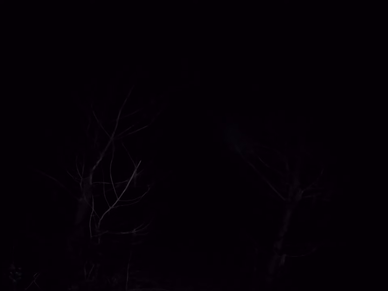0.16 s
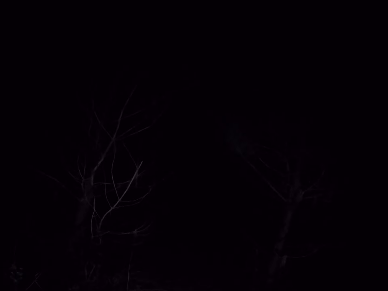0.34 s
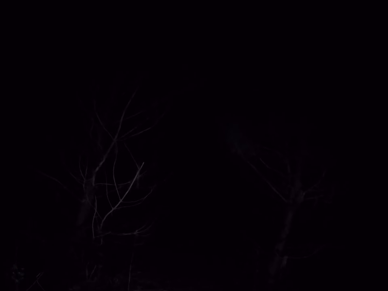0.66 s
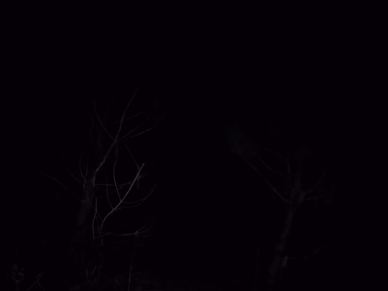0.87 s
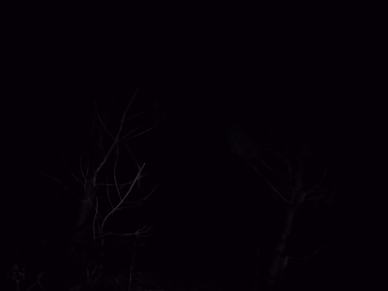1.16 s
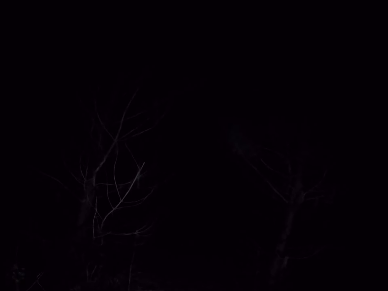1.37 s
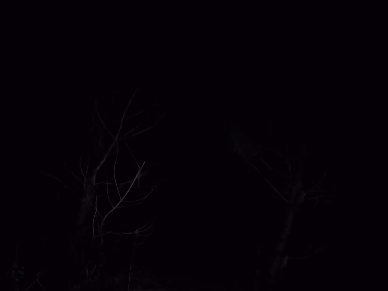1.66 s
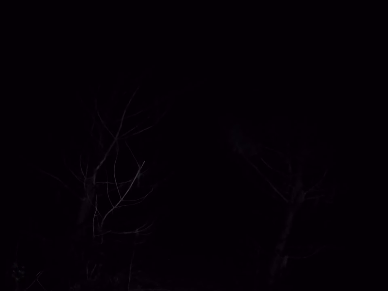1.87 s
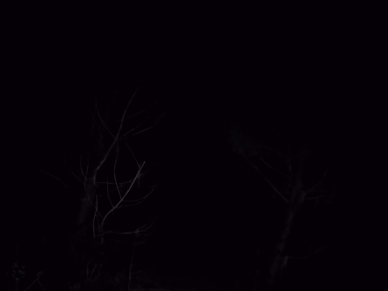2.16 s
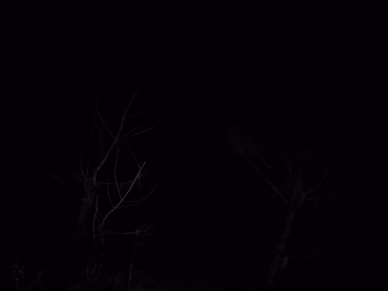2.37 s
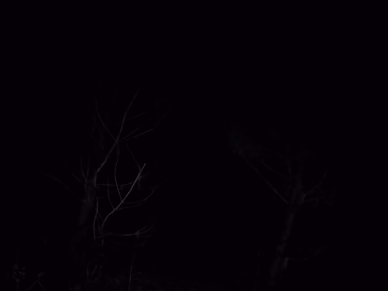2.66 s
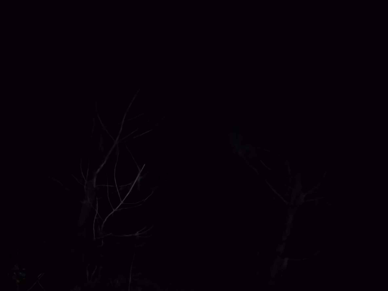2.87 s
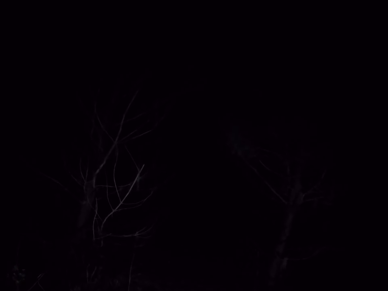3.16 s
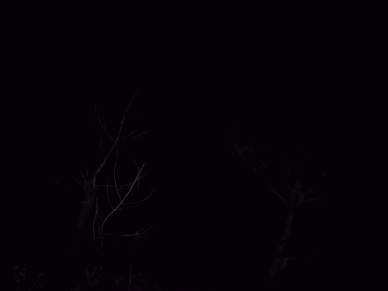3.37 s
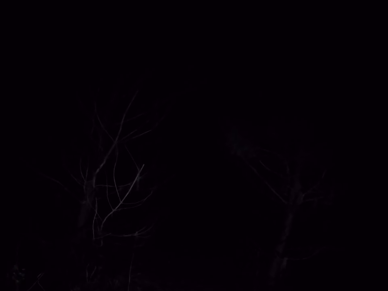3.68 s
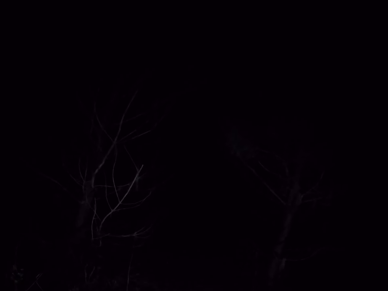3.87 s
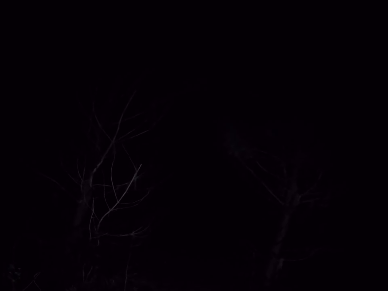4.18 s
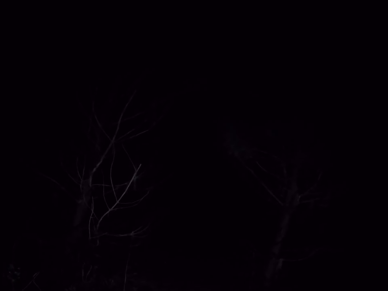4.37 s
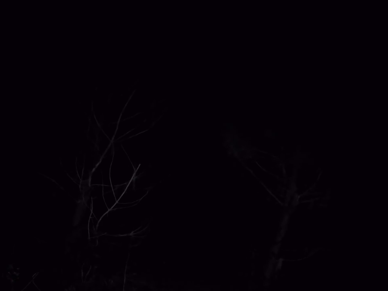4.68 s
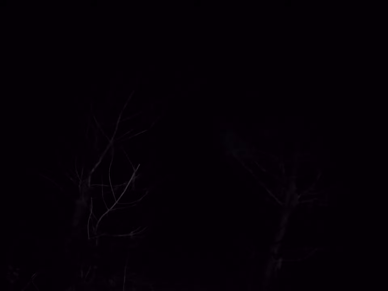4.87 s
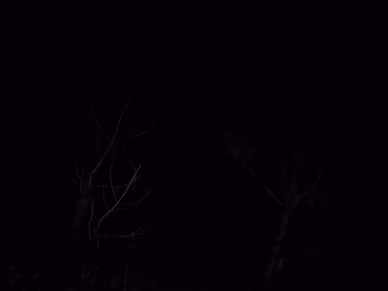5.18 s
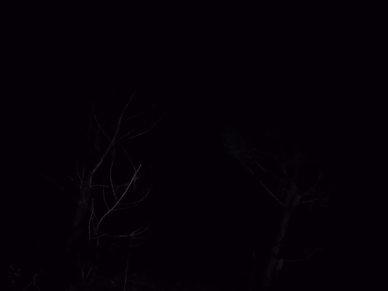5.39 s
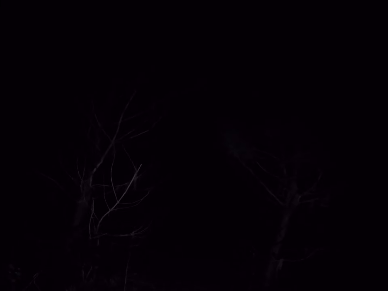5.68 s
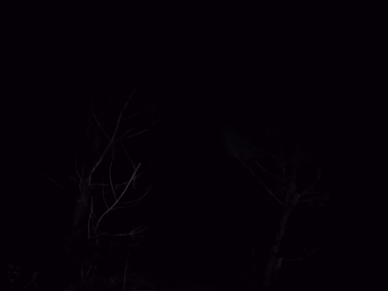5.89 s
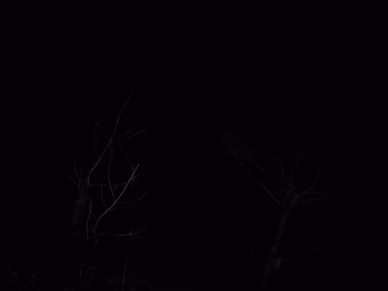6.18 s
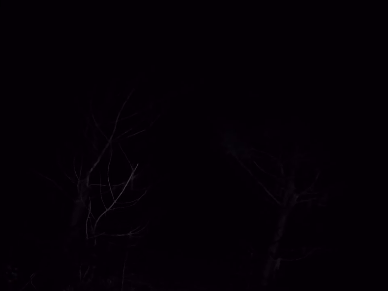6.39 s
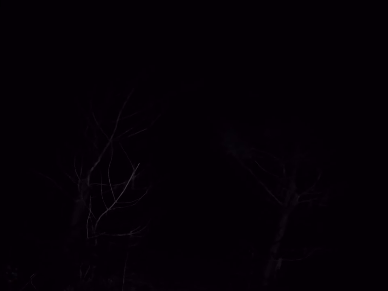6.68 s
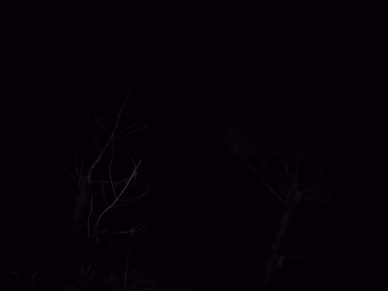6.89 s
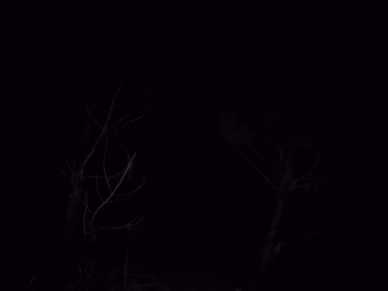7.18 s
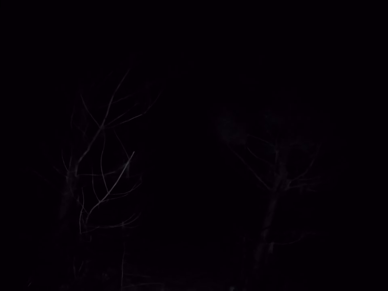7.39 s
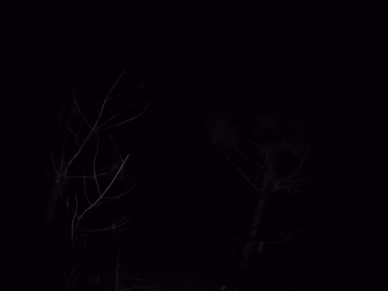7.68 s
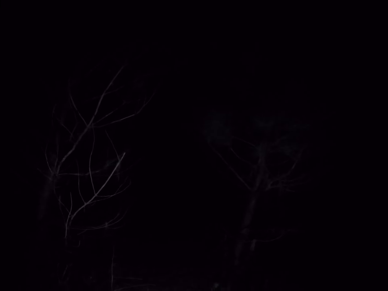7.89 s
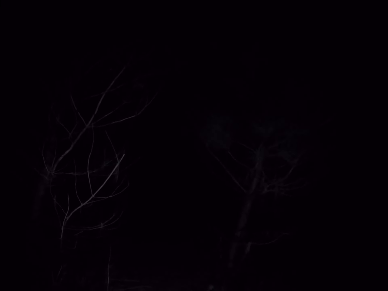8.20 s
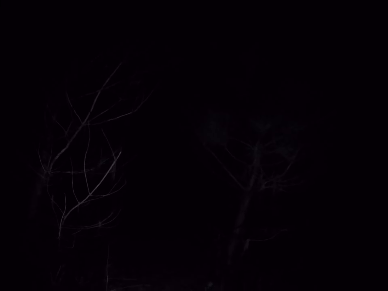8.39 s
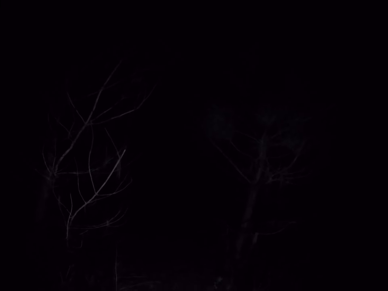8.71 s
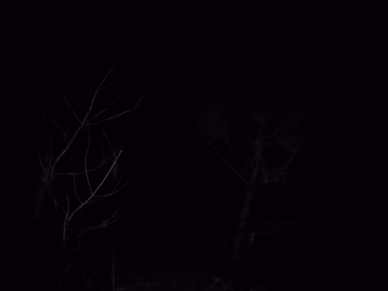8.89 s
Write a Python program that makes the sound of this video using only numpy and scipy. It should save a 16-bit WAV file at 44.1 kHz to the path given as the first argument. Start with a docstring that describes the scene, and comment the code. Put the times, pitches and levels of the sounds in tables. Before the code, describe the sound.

Distant hounds bay and bark hoarsely through echoing night woods while crickets chirp steadily close by and katydids rasp over a faint insect hiss.

```python
"""Hounds bay and bark far off in night woods: sung overtone stacks and hoarse pulse trains. The trees smear
every call into a long echo of decaying noise. Close by, crickets chirp, tick and trill as gated tones and
katydids rasp as toothed noise; farther insects hiss in bands, with sizzle and faint ticks of shaped noise; a
few breathy puffs of dull noise come and go. Air and far rumble lie under all, and the hand-held recorder takes
a few soft bumps."""
import sys
import numpy as np
from scipy import signal
from scipy.fft import rfft, irfft, next_fast_len
from scipy.io import wavfile
from scipy.ndimage import uniform_filter1d, map_coordinates

SR = 44100
rng = np.random.default_rng(int(sys.argv[2]) if len(sys.argv) > 2 else 0)


def transcribe(signal):
    """Save signal, clipped to [-1, 1], as a 16-bit WAV file at the path in sys.argv[1]."""
    frames = np.atleast_2d(signal).T
    limited = np.clip(frames, -1, 1)
    pcm = np.round(limited * 32767).astype(np.int16)
    wavfile.write(sys.argv[1], SR, pcm)


N = 399105
TIME_S = np.arange(N) / SR

# throat resonances of the nearer and farther barking dogs: centre_hz, width_hz, level_db
NEAR_THROAT = [(793, 96, 0), (998, 27, 1.5), (1300, 84, 0.5), (1440, 60, 5.5), (1650, 170, 0)]
FAR_THROAT = [(666, 253, -5.5), (965, 96, -5), (1264, 52, -2), (1410, 41, 1), (1680, 175, -9)]


def amp(db):
    """Decibels to gain."""
    return 10 ** (np.asarray(db) / 20)


def unit(x):
    """Scaled to rms 1."""
    return x / np.sqrt(np.mean(x ** 2) + 1e-20)


def along(points, hz):
    """Values at hz, read between (Hz, value) points on a log frequency axis."""
    f, v = np.transpose(points)
    return np.interp(np.log(hz + 1), np.log(f + 1), v)


def wobble(rate, size=N):
    """A smooth random curve with rate knots a second."""
    coarse = np.arange(0, size + 16, 16)
    knots = rng.standard_normal(int(size * rate / SR) + 4)
    curve = map_coordinates(knots, [coarse * rate / SR])
    return np.interp(np.arange(size), coarse, curve)


def filtered(x, response):
    """x shaped by a complex response of frequency."""
    m = next_fast_len(x.shape[-1] + 8192)
    spectrum = rfft(x, m) * response(np.fft.rfftfreq(m, 1 / SR))
    return irfft(spectrum, m)[..., :x.shape[-1]]


def resonances(modes):
    """Causal response of (centre Hz, width Hz, dB) resonances, added with alternating sign."""
    def response(f):
        return sum((-1) ** k * amp(db) * 1j * f * w / (c * c - f * f + 1j * f * w)
                   for k, (c, w, db) in enumerate(modes))
    return response


def call(rows):
    """First sample, times, soft edges and per-sample columns of one call."""
    s, *cols = np.transpose(rows)
    first = round(s[0] * SR)
    t = np.arange(first, min(N, round(s[-1] * SR))) / SR
    since_start = t - s[0] + (s[0] == 0)  # a call at time zero is already under way
    edge = np.clip(np.minimum(since_start / 0.0043, (s[-1] - t) / 0.019), 0, 1)
    return first, t, edge, [np.interp(t, s, c) for c in cols]


def add(track, x, at):
    """Mix x into track from sample at."""
    at = max(at, 0)
    track[at:at + len(x)] += x[:len(track) - at]


def hiss(spectrum, patchy_db):
    """Noise of rms 1 with patches of random gain in time and frequency."""
    z = signal.stft(rng.standard_normal(N), nperseg=512)[2]
    field = uniform_filter1d(rng.standard_normal(z.shape), 6, 0)
    field = uniform_filter1d(field, 14, 1)
    patchy = signal.istft(z * amp(patchy_db * unit(field)), nperseg=512)[1][:N]
    return unit(filtered(patchy, lambda hz: amp(along(spectrum, hz))))


def bays():
    """Overtone stacks on the pitch, brighter as the mouth opens; rough voices shake in phase and size."""
    # sung bays, one list each: time_s, pitch_hz, level_db, mouth opening as slope_db_per_octave
    sung = [
        [(0, 676, -41.5, -3), (.06, 675, -42.5, -10), (.135, 675, -52, -6)],
        [(.405, 410, -70, 3), (.425, 473, -63, 4.5), (.45, 528, -58, 6), (.48, 539, -52.5, 0.5),
         (.51, 584.4, -44, -13), (.55, 589, -41, -10), (.6, 594, -44, -20), (.63, 578, -52, 0)],
        [(3.16, 659, -60, -4), (3.19, 668, -41, -24), (3.22, 685.3, -36, -24), (3.25, 655.3, -43.5, -13),
         (3.28, 681, -33, -18.5), (3.39, 666, -66, 3)],
        [(3.79, 649, -51, -13), (3.82, 665, -38.5, -20), (3.85, 714, -41.5, -5.5), (3.88, 720.7, -39, -12),
         (3.99, 725, -44, -17), (4.03, 707, -60, -4)],
        [(5.36, 724, -80, -5), (5.39, 744, -52, -7), (5.43, 788, -58.5, 3), (5.48, 817, -55.5, -3),
         (5.53, 826, -76, -4)],
        [(5.72, 525, -69, -6), (5.75, 548, -59.5, -4), (5.78, 602, -51, -3.5), (5.81, 609, -45.5, -6),
         (5.86, 618.6, -36, -19.5), (5.9, 619.7, -40, -30), (5.99, 614, -66, -15)],
        [(7.63, 325.5, -80, -8), (7.665, 436, -64, -1), (7.69, 501, -55, -3), (7.725, 515, -51.5, 1),
         (7.745, 571, -39, -22), (7.77, 578, -43, -8), (7.855, 566.6, -55, -8), (7.89, 490, -61, -15)],
        [(8.55, 485, -74, -2), (8.59, 521.8, -60, 3.5), (8.63, 561.6, -50, 0), (8.67, 596, -43, -7.5),
         (8.71, 598, -46.5, -18), (8.8, 614, -48, -19)],
        [(8.59, 697, -55, -19), (8.615, 699.4, -36, -13.5), (8.69, 708, -44, -6), (8.78, 698, -41.5, -23),
         (8.81, 684, -43, -7)],
    ]
    # voice of each bay: roughness (0-1), upper_db (harmonics above 2), edge_db more (harmonics above 5)
    voices = [(0.17, -5, 0), (0.05, 0, -7), (0.21, -3, 10), (0.1, 2, -8), (0.14, -5, -2), (.05, 0.5, -3),
              (0.04, -3.5, -4), (.17, -4.5, -3), (0.12, -2, 18)]
    # throat colour of the harmonics: frequency_hz, level_db
    colour = [(900, -2), (1150, 1.5), (1400, 0), (1620, 1.5), (2000, -6.5), (2550, 1), (2750, -0.5),
              (3000, -15.5), (9000, -27)]
    octave_share = 0.86  # the second harmonic feels the closing mouth less
    out = np.zeros(N)
    for rows, (rough, upper_db, edge_db) in zip(sung, voices):
        at, t, edge, (hz, db, slope_db) = call(rows)
        size = len(t)
        phase = 2 * np.pi * np.cumsum(hz) / SR + 3 * rough * wobble(140.8, size)
        stack = amp(db) * np.sin(phase)
        for k in range(2, 13):
            octaves = np.log2(min(k, 4)) if k > 2 else octave_share
            level_db = db + slope_db * octaves + along(colour, k * hz)
            level_db = level_db + (k > 2) * upper_db + (k > 5) * edge_db
            # each harmonic breaks up on its own, in level and in phase
            breaking_db = 2.5 * wobble(80, size) + 3 * wobble(25, size)
            drift = .4 * (k - 1) * wobble(80, size) + rng.uniform(0, 2 * np.pi)
            stack += amp(level_db + breaking_db) * np.sin(k * phase + drift)
        shake = amp(11.0 * rough * wobble(67.0, size))
        add(out, np.sqrt(2) * edge * stack * shake, at)
    return out


def barks():
    """Fold pulses start regular, then alternate strong and weak and turn unsteady; throat and muzzle colour them."""
    # hoarse barks: start_s, attack_s, length_s until the release, level_db, mean fold pulses_hz,
    # throat, clear_s before the voice turns unsteady, first muzzle brightness_db
    hoarse = [(.055, .04, .13, -42.5, 333, FAR_THROAT, 0.0031, -8.5),
              (2.909, .016, 0.11, -36.5, 336, NEAR_THROAT, 0.019, 0.5),
              (3.159, .03, 0.15, -46, 336, FAR_THROAT, 0.0013, -6),
              (3.62, 0.013, .11, -38, 337, NEAR_THROAT, 0.021, 1),
              (5.376, .025, 0.0886, -52.5, 348, FAR_THROAT, 0.00095, 1.5),
              (8.75, 0.082, 0.19, -45.5, 344, FAR_THROAT, 0.0027, 1.5)]
    # muzzle resonances: centre_hz, width_hz, level_db
    muzzle = [(2100, 420, 15.5), (3100, 720, 11.5)]
    # the mouth before it opens: centre_hz, width_hz, level_db
    closed = [(924, 170, 3), (1740, 45, -9)]
    bright_s, dulling_db_per_s, dullest_db = 0.03, 328, -25  # the muzzle stays bright, then closes
    release_db_per_s, tail_s = 330, .09

    def coloured(source, modes):
        """Source through resonances, thinned below 600 Hz and above 3200 Hz, at rms 1."""
        def response(f):
            low_cut = (f / 600) ** 6 / (1 + (f / 600) ** 6)
            return resonances(modes)(f) * low_cut / (1 + (f / 3200) ** 8)
        return unit(filtered(source, response))

    out = np.zeros(N)
    for s, attack, length, peak_db, hz, throat, clear, first_db in hoarse:
        at, t, edge, _ = call([(s,), (s + length + tail_s,)])
        size, since = len(t), t - t[0]
        edge = edge * np.clip((t - s) / attack, 0, 1)
        db = peak_db - release_db_per_s * np.maximum(t - s - length, 0)
        bright_db = first_db - dulling_db_per_s * np.maximum(t - s - bright_s, 0)
        bright_db = np.maximum(bright_db, dullest_db)

        chaos = np.clip((since - clear) / 0.022, .02, 1)
        unsteady = chaos * (.1 * wobble(150, size) + .03 * wobble(25, size))
        cycles = np.cumsum(hz * np.exp(unsteady)) / SR
        pulses = np.diff(np.floor(cycles), prepend=0)
        size_db = chaos * (3 * (-1) ** np.floor(cycles) + rng.uniform(-3, 3, size))
        breath = .8 * chaos * rng.standard_normal(size)
        source = unit(pulses * amp(size_db)) + breath

        sink = np.clip((since - .05) / 0.083, 0, 1)  # the throat lengthens and its resonances fall
        lowered = [(.91 * c, w, g) for c, w, g in throat]
        voice = np.sqrt(1 - sink) * coloured(source, throat) + np.sqrt(sink) * coloured(source, lowered)
        voice += amp(bright_db) * coloured(source, muzzle)
        opening = np.clip((since - clear / 2) / 0.025, 0, 1)
        voice = opening * voice + 0.97 * (1 - opening) * coloured(source, closed)
        add(out, edge * amp(db) * voice, at)
    return out


def woods(x):
    """Trunks scatter each short stretch of sound along its own paths; highs die first."""
    # echo decay among the trees: frequency_hz, t60_s
    decay = [(500, 0.81), (1300, 0.96), (3000, 0.54), (8000, 0.11)]
    out, step = np.zeros(N), SR // 9
    for at in range(0, N, step):
        stretch = x[at:at + step]
        if np.any(stretch):
            hz, t, z = signal.stft(rng.standard_normal(SR), SR, nperseg=256)
            fading = z * amp(-60 * t / along(decay, hz)[:, None])
            tail = signal.istft(fading, SR, nperseg=256)[1]
            # the echo starts 300 samples behind the call
            add(out, signal.fftconvolve(stretch, tail / np.linalg.norm(tail)), at + 300)
    return out


def chirp(length, hz, rate, blur):
    """Wing strokes at a steady rate, each a short tone, slightly unsteady."""
    t = np.arange(round((length + 1 / rate) * SR)) / SR
    gate = np.clip(np.sin(np.pi * rate * t) ** 2 * 3.0 - .25, 0, 1)
    gate = gate * amp(1.3 * wobble(33.0, size=len(t)))
    phase = 2 * np.pi * hz * t + blur * wobble(120, size=len(t))
    return gate * np.sin(phase + rng.uniform(0, 2 * np.pi))


def crickets():
    """Wing-stroke tones: a near cricket's chirps, farther chirps, and evenly spaced single ticks."""
    # near cricket: first_stroke_s, length_s from there
    near = [(.002, 0.1), (0.273, .13), (.568, 0.071), (0.888, .13), (1.188, 0.13), (1.538, .098),
            (1.842, 0.095), (2.1, 0.11), (2.388, .09), (2.669, .13), (2.986, 0.082), (3.251, 0.15),
            (3.591, 0.081), (3.862, 0.079), (4.125, 0.1), (4.406, 0.16), (4.712, 0.17), (5.062, 0.11),
            (5.393, 0.12), (5.697, .051), (5.981, 0.11), (6.262, 0.19), (6.601, 0.14), (6.843, .028),
            (6.988, .13), (7.372, 0.087), (7.669, .199), (8.389, .03), (8.643, 0.12), (8.955, .06)]
    # near cricket's mean level: time_s, level_db
    near_level = [(0, -51.5), (6.1, -51.5), (7.7, -55), (9.05, -56)]
    # farther crickets: middle_s, level_db, pitch_hz
    farther = [(0.64, -59, 6170), (.981, -58, 6330), (1.551, -60, 6320), (2.3, -61, 6280),
               (2.646, -61, 6150), (3.009, -63, 6170), (3.332, -56, 6240), (3.615, -58, 6200),
               (3.932, -60, 6240), (4.237, -54, 6200), (4.508, -56, 6160), (4.876, -57, 6300),
               (5.405, -59, 6100), (5.733, -59, 6060), (6.099, -61, 6050), (6.633, -58, 6160),
               (7.157, -57, 6120), (7.585, -57, 6040), (7.97, -60, 6100), (8.983, -58.5, 6040)]
    # runs of single strokes: first_s, last_s, stroke count, mean level_db, pitch_hz
    runs = [(0.022, 0.844, 7, -65, 7670), (1.125, 1.98, 7, -64, 7460), (2.375, 2.737, 4, -64, 7440),
            (2.917, 3.517, 5, -72, 7400), (3.1, 3.8, 6, -67, 7740), (3.981, 6.494, 19, -68, 7630),
            (6.658, 8.978, 20, -64, 7450)]
    out = np.zeros(N)
    for s, length in near:
        db = np.interp(s, *np.transpose(near_level)) + rng.normal(0, 0.41)
        add(out, amp(db) * chirp(length, hz=6587, rate=33.4, blur=0.81), round((s - .015) * SR))
    for s, db, hz in farther:
        add(out, amp(db) * chirp(.1, hz, rate=35.5, blur=1.05), round((s - .065) * SR))
    for first, last, count, db, hz in runs:
        for s in np.linspace(first, last, count):
            tick = chirp(0, hz, rate=36, blur=0.67)
            add(out, amp(db + rng.normal(0, 1.2)) * tick, round((s - .011) * SR))
    return out


def tree_cricket():
    """A trill of wing strokes, each a tone that slides down in pitch."""
    # stroke rate: time_s, strokes_hz
    stroke_rate = [(4, 43.97), (4.9, 43.9), (6.7, 42.1), (7.6, 42), (9.05, 42.32)]
    # trill level, ahead of a one-second fade-in: time_s, level_db
    trill = [(4, -43), (4.5, -55.5), (5.3, -56.5), (6.1, -54), (7.1, -56), (7.5, -62.5), (8.3, -59.5),
             (9.05, -61.5)]
    rate = np.interp(TIME_S, *np.transpose(stroke_rate)) * (TIME_S > stroke_rate[0][0])
    cycle = (.5 + np.cumsum(rate) / SR) % 1
    stroke = np.clip(np.sin(np.pi * cycle) ** 2 * 1.7 - .5, 0, 1) * amp(wobble(40))
    sliding_hz = 3370 + 330 * (.5 - cycle)
    tone = np.sin(2 * np.pi * np.cumsum(sliding_hz) / SR + 0.91 * wobble(200))
    swell = amp(np.interp(TIME_S, *np.transpose(trill))) * np.clip(TIME_S - trill[0][0], 0, 1)
    return swell * unit(stroke * tone)


def near_katydids():
    """A rasp is a short and a long wing stroke of fast tooth clicks, made as pulsed noise."""
    # rasps: start_s, level_db
    rasps = [(1.005, -67), (1.77, -77), (2.53, -74), (3.025, -67), (3.93, -65.5), (5.54, -66),
             (6.511, -65.5), (7.498, -72), (8.112, -59.5)]
    strokes = np.zeros(N)
    for s, db in rasps:
        add(strokes, amp(db) * np.sqrt(np.hanning(round(0.024 * SR))), round(s * SR))
        add(strokes, amp(db) * np.sqrt(np.hanning(round(0.059 * SR))), round((s + 0.02) * SR))
    teeth = 1.1 + np.sin(np.pi * 190 * TIME_S + wobble(30)) ** 4  # 190 clicks a second
    spectrum = [(8500, -40), (10000, -11), (10900, -5), (12800, -15), (14500, -30)]
    return strokes * unit(teeth * hiss(spectrum, patchy_db=4.5))


def far_katydids():
    """Distant katydids call in phrases that swell as a band of hiss."""
    # phrases: start_s, length_s, level_db
    phrase_rows = [(0, .15, -58), (0.884, 0.41, -59.5), (1.776, 0.38, -60.5), (2.6, 0.6, -60),
                   (3.593, 0.4, -59), (4.197, 0.58, -60.5), (5.3, 0.404, -59), (6.185, 0.37, -60),
                   (7.345, 0.41, -60), (8.095, 0.5, -60)]
    # shape of the band: frequency_hz, relative_db
    band = [(1700, -19), (2200, -2.5), (2900, 0.5), (4000, -7), (4700, -1.5), (5300, -7), (5800, -27)]
    between_db, edge_s = -65.5, .1
    phrases = np.zeros(N)
    for s, length, db in phrase_rows:
        inside_s = np.minimum(TIME_S - s, s + length - TIME_S)
        phrases += amp(db) * np.clip(inside_s / edge_s + .5, 0, 1)
    return np.maximum(phrases, amp(between_db)) * hiss(band, patchy_db=1.5)


def treble_sizzle():
    """Hissy bursts in the top treble rise fast and fade slowly over a steady faint hiss."""
    # bursts: start_s, level_db, fade_s per 10 dB
    burst_rows = [(1.0, -75, .3), (1.93, -67, 0.4), (2.54, -71, .35), (4.69, -74, 1), (4.98, -78, 0.8),
                  (6.85, -73, 1), (8.5, -68, .4)]
    # shape of the band: frequency_hz, relative_db
    band = [(10500, -45), (12200, -3), (13500, 1), (15300, -2)]
    floor_db, rise_s = -85, 0.037
    level = np.full(N, amp(floor_db))
    for s, db, fade in burst_rows:
        fading_db = db - 10 * np.maximum(TIME_S - s, 0) / fade
        level += amp(fading_db) * np.clip((TIME_S - s) / rise_s, 0, 1)
    return level * hiss(band, patchy_db=2.2)


def handling():
    """Soft bumps on the recorder's body: low tones that drop in pitch and die fast."""
    # bumps: start_s, strength_db ahead of attack and decay, starting pitch_hz
    bumps = [(1.282, -43, 124), (3.07, -41, 185), (3.346, -43, 140), (5.465, -40.5, 241), (8.753, -39, 132)]
    out, t = np.zeros(N), np.arange(SR // 8) / SR
    for s, db, hz in bumps:
        envelope = amp(db - 60 * t / 0.067) * (1 - np.exp(-t / 0.0037))
        add(out, envelope * np.sin(2 * np.pi * hz * t * (1 - 1.83 * t)), round(s * SR))
    return out


def breathy_puffs():
    """A long soft breath-like puff of dull noise and two short ones, each swelling and fading."""
    # puffs: start_s, length_s, level_db at the middle
    puffs = [(4.408, 0.99, -60), (7.032, 0.18, -69.5), (8.091, 0.095, -59.5)]
    out = np.zeros(N)
    for s, length, db in puffs:
        add(out, amp(db) * np.hanning(round(length * SR)), round(s * SR))
    spectrum = [(150, -40), (250, 2.5), (600, -2.5), (1400, 0.5), (2000, -27)]
    return out * hiss(spectrum, patchy_db=4)


def crackle():
    """Faint, sparse ticks in the top treble: short decaying noise at random times."""
    s, size = rng.uniform(0, 1, (2, 110))
    t, out = np.arange(300) / SR, np.zeros(N)
    for at, db in zip(s * N, -74 + 9 * size):
        add(out, amp(db - 60 * t / .012) * rng.standard_normal(300), int(at))
    spectrum = [(7500, -40), (10000, 11), (15000, 0)]
    return filtered(out, lambda hz: amp(along(spectrum, hz)))


def chorus():
    """Many far crickets merge into throbbing bands of noise."""
    # far cricket choirs: centre_hz, width_hz, mean level_db
    choirs = [(2163, 210, -68), (3363, 224, -62), (3678, 178, -64.5), (6184, 420, -66.5), (6590, 400, -63),
              (7000, 640, -66.5), (7100, 59, -70.5)]
    out = np.zeros(N)
    for hz, w, db in choirs:
        band = unit(filtered(rng.standard_normal(N), lambda f: np.exp(-((f - hz) / w) ** 2)))
        throb_db = 0.42 * wobble(3.15) + 0.5 * wobble(35)
        out += amp(db + throb_db) * band
    return out


def night_air():
    """Air and far rumble: steady noise, strongest in the bass."""
    # shape of the noise: frequency_hz, relative_db
    spectrum = [(12, -50), (22, 2.5), (50, -0.5), (110, -10), (220, -15), (600, -21.5), (1600, -24),
                (5500, -29), (8200, -34), (15000, -38.5)]
    return amp(-56.5) * hiss(spectrum, patchy_db=1.7)


def scene():
    """Dogs in the woods, insects around, night air under all."""
    dogs = bays() + barks()
    echo = amp(-9.0) * woods(dogs)
    insects = crickets() + tree_cricket() + near_katydids() + far_katydids() + chorus()
    small_noises = treble_sizzle() + handling() + breathy_puffs() + crackle()
    return (dogs + echo + insects + small_noises + night_air())[None]


def record(dry):
    """The recorder keeps nothing above its band limit."""
    top_hz = 15262
    return filtered(dry, lambda hz: hz < top_hz)


dry = scene()
out = record(dry)
transcribe(out)
```